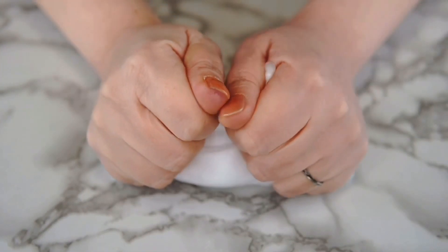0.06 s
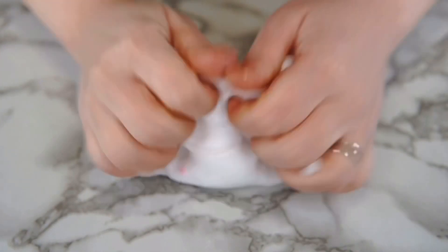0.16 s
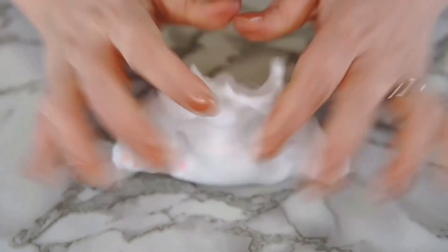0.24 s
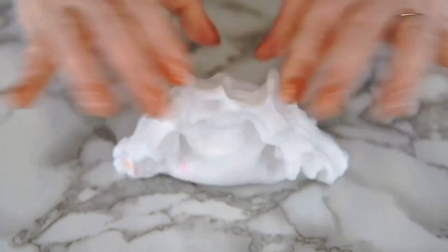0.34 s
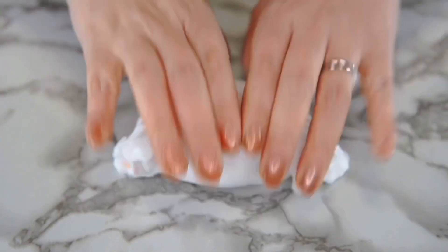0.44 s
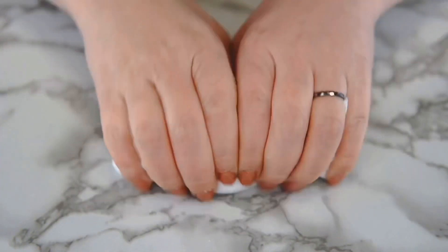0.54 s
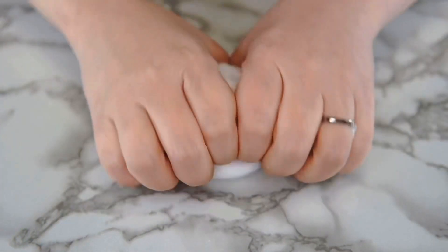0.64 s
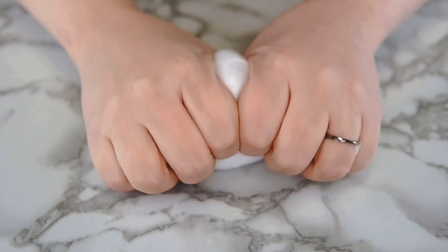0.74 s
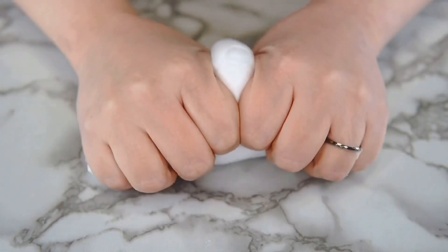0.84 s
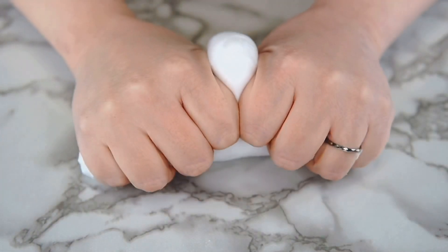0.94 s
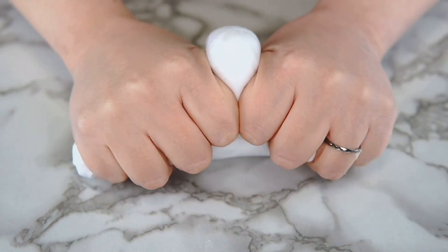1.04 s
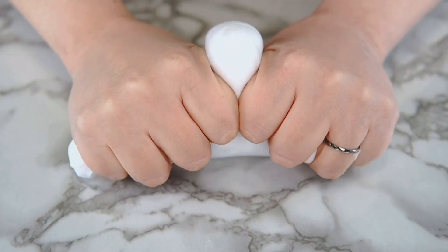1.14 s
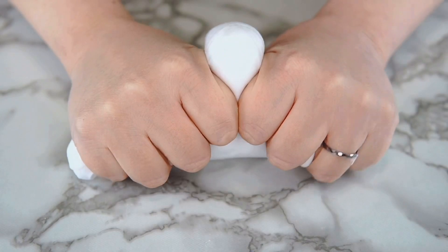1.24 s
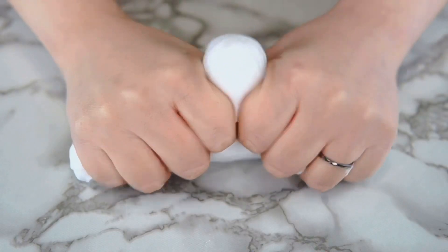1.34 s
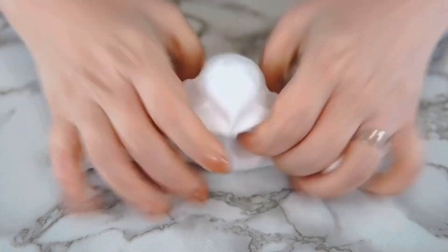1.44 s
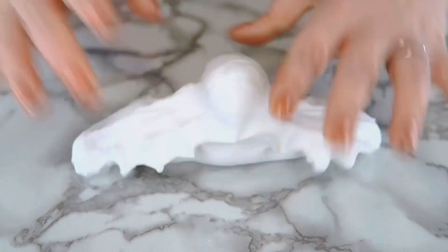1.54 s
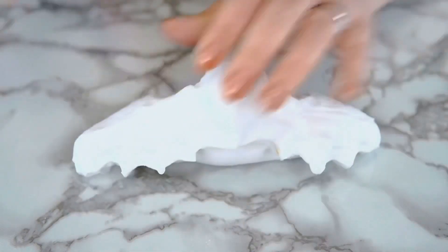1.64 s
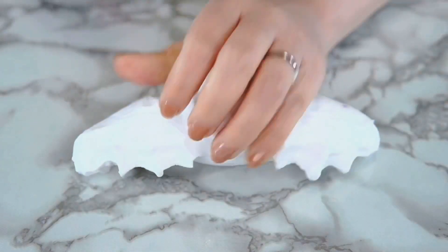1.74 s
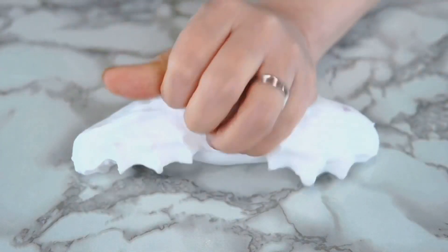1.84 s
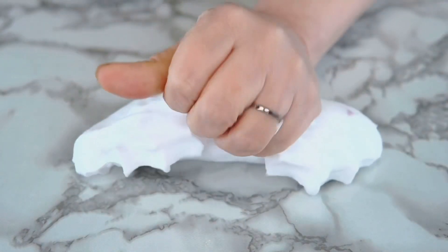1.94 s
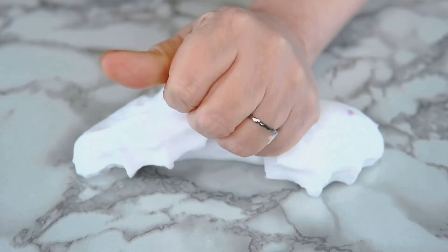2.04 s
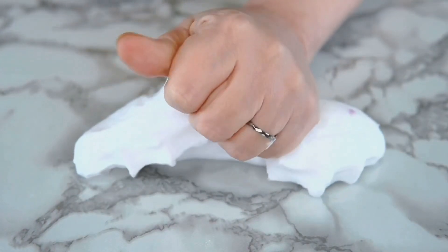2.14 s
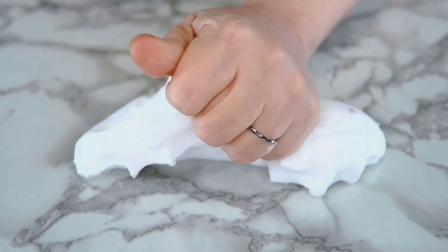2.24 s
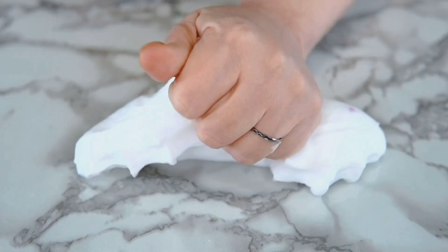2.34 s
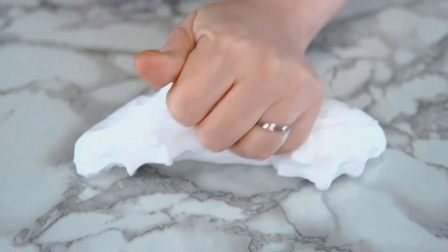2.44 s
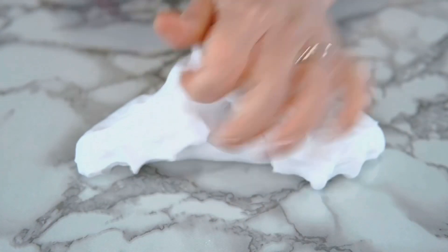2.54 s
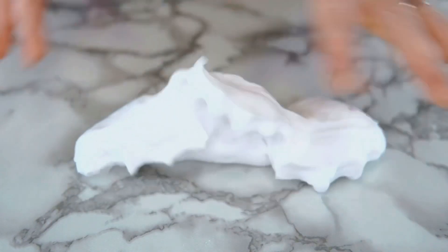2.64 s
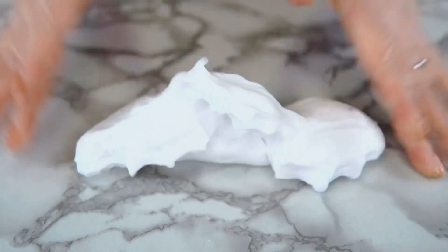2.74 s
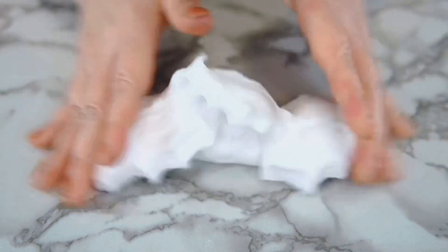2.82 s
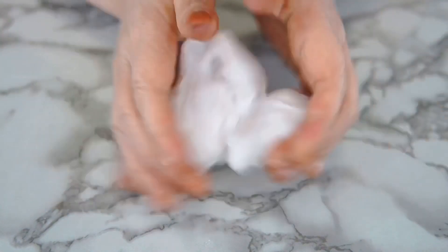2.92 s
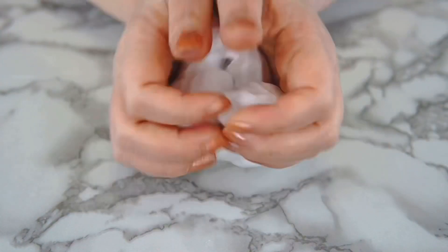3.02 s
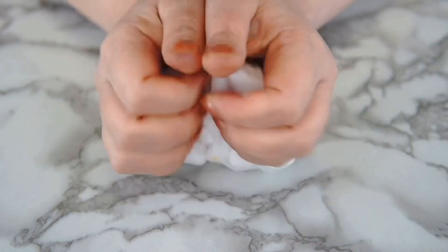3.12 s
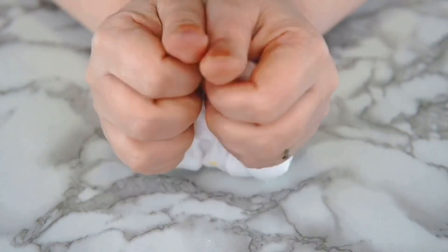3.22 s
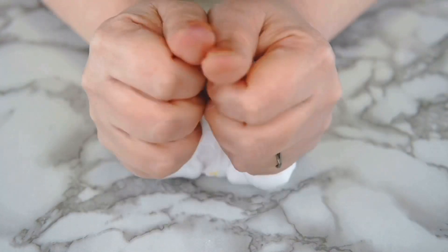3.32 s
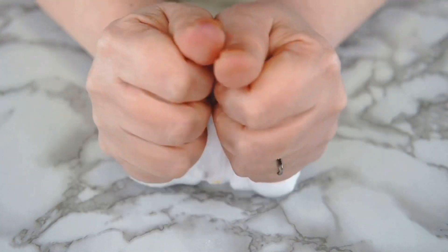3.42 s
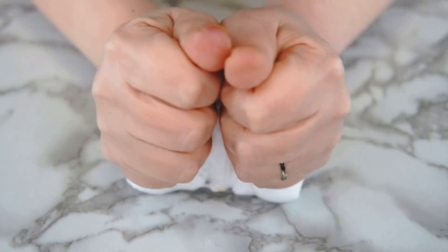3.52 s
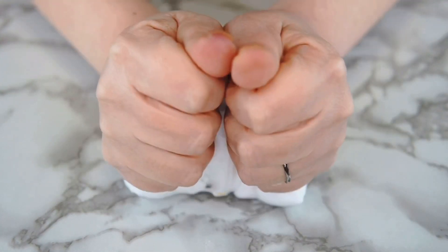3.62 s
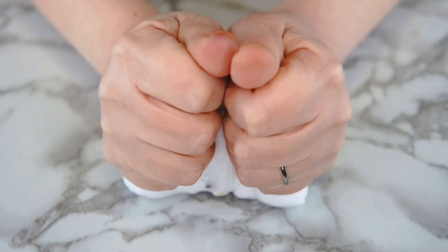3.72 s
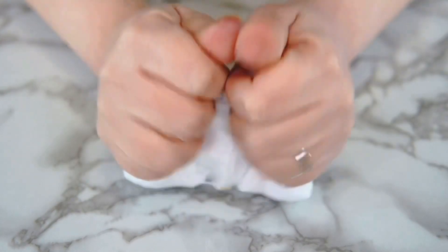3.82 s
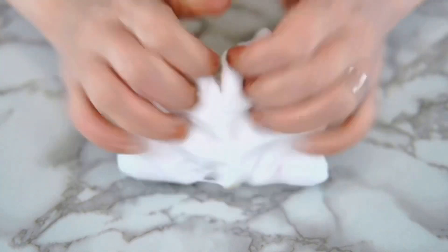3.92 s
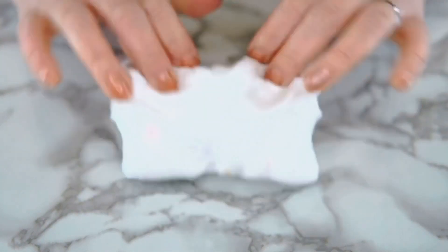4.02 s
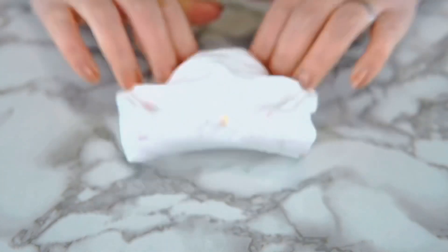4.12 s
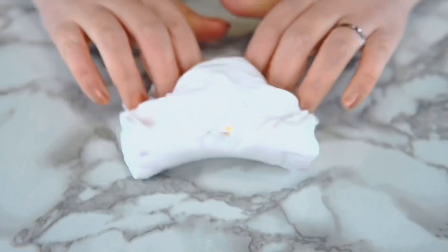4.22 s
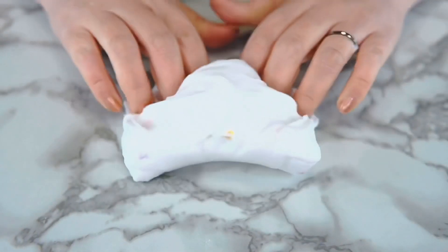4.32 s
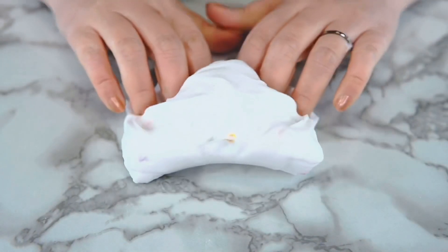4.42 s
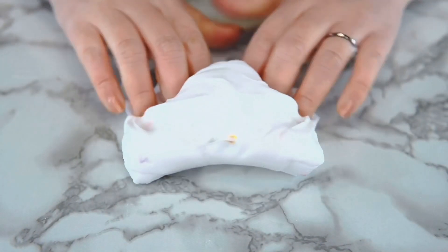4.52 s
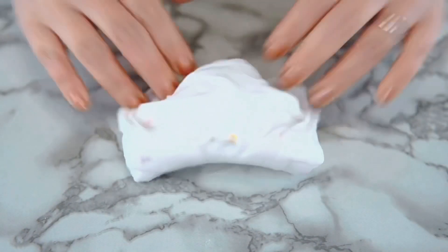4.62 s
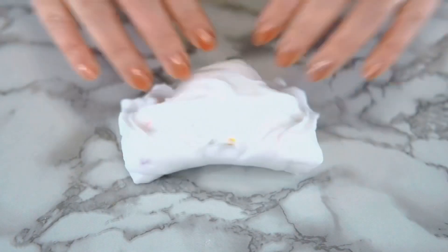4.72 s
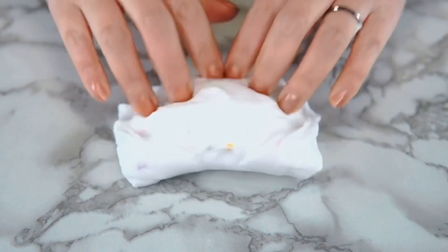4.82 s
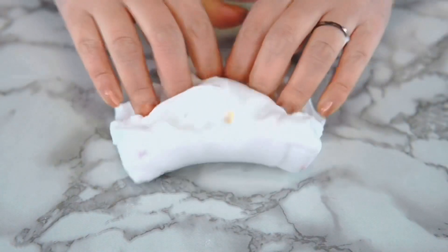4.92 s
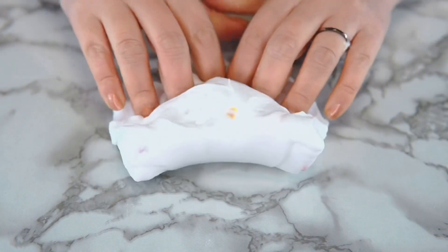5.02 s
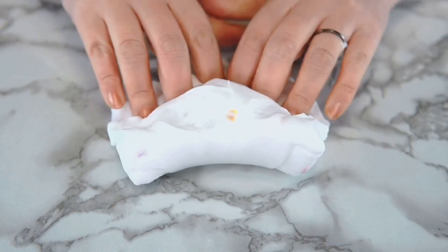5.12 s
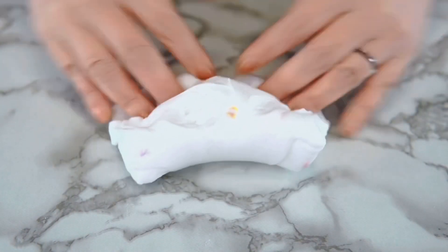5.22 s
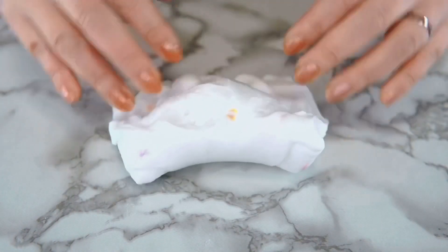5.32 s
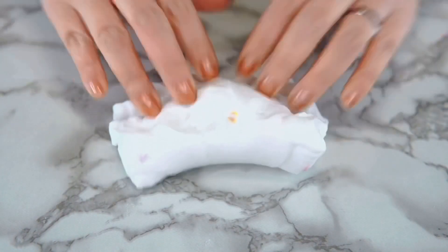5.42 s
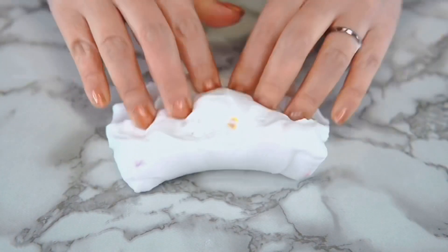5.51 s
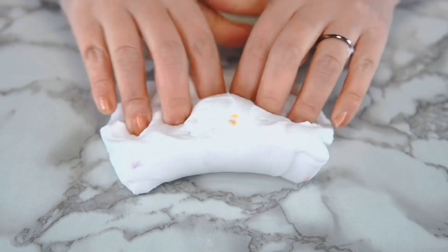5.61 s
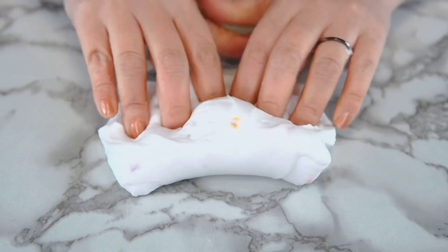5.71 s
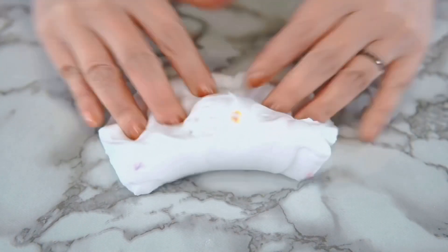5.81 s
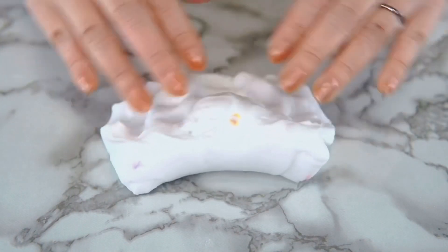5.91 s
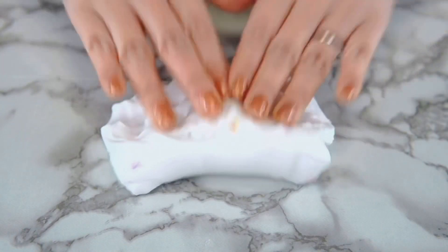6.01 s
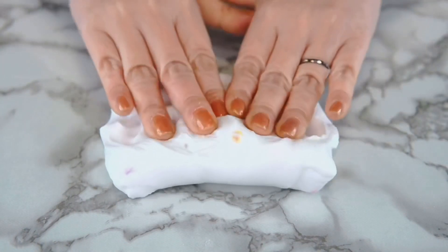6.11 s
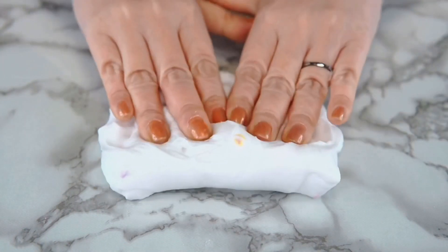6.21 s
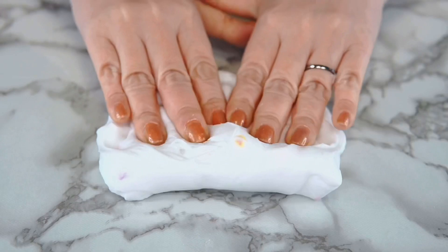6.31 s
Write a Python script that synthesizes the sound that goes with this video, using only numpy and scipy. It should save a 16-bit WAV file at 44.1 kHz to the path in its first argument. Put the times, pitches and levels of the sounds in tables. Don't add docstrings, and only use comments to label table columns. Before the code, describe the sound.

Foamy wet slime is kneaded, wrung and flattened. Air cells burst as sharp, brittle snaps scattered left and right, with falling wet plops, brief fizz and small ringing bubble notes. Low soft thuds come from the mass folding and the stand being nudged. Close stereo microphones, nearly silent room; busy first half, sparse quiet second half.

```python
import sys
import numpy as np
from scipy import signal
from scipy.io import wavfile
from scipy.ndimage import uniform_filter1d

SR = 44100
rng = np.random.default_rng(int(sys.argv[2]) if len(sys.argv) > 2 else 0)


def waveform_to_disk(signal):
    frames = np.transpose(np.atleast_2d(signal))
    scaled = np.clip(frames, -1, 1) * 32767
    samples = np.round(scaled).astype(np.int16)
    wavfile.write(sys.argv[1], SR, samples)


def how_loud(loudness_db):
    steps = np.asarray(loudness_db, float) / 20
    return 10 ** steps


N = 280476

# (time [s], peak [dB], ring [Hz], left-right [dB], after-fizz [dB])
LARGE_CELLS = [(0.5203, -4, 5950, -2.5, -15), (0.6057, -2.5, 7570, 5, -54.5),
               (0.6587, 0.5, 4200, -3.5, -13), (0.7423, -9.5, 9200, 0, -36), (0.745, -9, 9200, -2, -38),
               (0.7663, 1.5, 9300, 3, -29.5), (0.8364, 5.5, 6000, 4, -30), (1.0014, 1.5, 7500, -0.5, -20),
               (1.7883, -12, 6100, 9, -23.5), (1.7926, -19, 4000, -1.5, -7), (2.017, -7.5, 6860, 5, -11.5),
               (2.0463, -1, 7400, 0.5, -36), (2.1032, -7.5, 8400, -4.5, -34.5),
               (2.121, -8, 7500, 1.5, -2.5), (2.139, -12, 5000, 1, -22), (2.2981, -8, 8050, -5, -7.5),
               (2.301, -5, 4300, 1, -10.5), (2.8075, -11, 7100, 0.5, -22), (2.9529, -5, 6320, 3.5, -46),
               (3.2043, -7.5, 7960, 1.5, -21.5), (3.4649, 4.5, 7390, -5, -27.5),
               (3.6632, -4, 8720, 12, -18.5), (4.8245, -7, 7200, -4.5, -13)]
# (time [s], peak [dB], ring [Hz], after-fizz [dB])
SMALL_CELLS = [(0.0504, -14.5, 7800, -14), (0.357, -38.5, 6000, -8.5), (0.4725, -30, 8300, -10),
               (0.5979, -19, 6530, -2.5), (0.731, -14.5, 8300, -34), (0.756, -17.5, 4070, -3),
               (0.8347, -20.5, 9500, 4.5), (0.9415, -11.5, 8250, -26), (0.97, -23, 6770, -34),
               (1.2618, -18.5, 8450, -13), (1.7627, -25.5, 7300, -13), (1.9361, -20.5, 4940, 3),
               (1.944, -8, 4830, -21), (2.156, -2.5, 7650, -23), (2.2692, -7, 7660, -30),
               (2.4141, -16, 8400, -14), (2.4804, -33, 8000, -4.5), (2.4936, -14.5, 9160, -51),
               (2.7577, -15.5, 6560, -16), (2.821, -19, 3600, -43), (2.843, -26.5, 8350, -10.5),
               (2.9349, -37, 10350, -24), (2.9494, -11.5, 8600, -20.5),
               (3.0346, -36.5, 8400, -20), (3.131, -8.5, 7730, -30.5), (3.1813, -20.5, 7700, -21.5),
               (3.2153, -17, 8250, -48), (3.289, -30, 6660, -18), (3.3042, -10, 7440, -35),
               (3.332, -14, 8400, -26), (3.355, -23, 7950, -26), (3.392, -26, 7660, -18),
               (3.4578, -16, 7760, -39), (3.4875, -15, 7300, -29), (3.5, -15.5, 8140, -20),
               (3.532, -19, 9000, -39), (3.564, -30.5, 6830, -20), (3.6446, -25.5, 7100, -39),
               (3.9369, -28.5, 8240, -28), (4.162, -41, 4580, -7.5), (4.3531, -44, 9100, -16.5),
               (4.465, -35, 6540, -5.5), (4.4876, -23.5, 6300, -6), (4.7253, -25.5, 7720, -30.5),
               (4.8057, -28, 5100, -6.5), (4.94, -30.5, 7550, -12), (5.108, -26.5, 7760, -16),
               (5.473, -18.5, 9300, -35), (5.6739, -29.5, 7540, -12.5), (5.9867, -45.5, 8920, -10),
               (6.0808, -42, 7880, -21.5), (6.2553, -35.5, 7610, -17),
               (0.0372, -36, 8480, -20), (0.647, -30, 3665, 12.5), (0.5044, -25.5, 9040, -17),
               (0.8233, -42, 6820, -19), (1.1655, -44.5, 7800, -29), (1.235, -36, 6700, -18),
               (2.3868, -19, 8000, -12), (1.7554, -43, 6960, -17), (1.858, -41.5, 8950, -27.5),
               (1.9302, -28, 8300, -16.5), (2.7015, -45, 10100, -16), (2.7331, -37, 4010, -10),
               (2.793, -26, 6620, -32), (3.0445, -41, 9250, -26), (3.0705, -41.5, 5950, -8),
               (3.2767, -36, 4330, -14), (3.3513, -16.5, 8540, -22.5), (3.4482, -29, 4290, -20),
               (3.5136, -23, 8030, -26), (3.592, -44, 7380, -23), (3.6275, -49, 8120, -22),
               (4.1275, -48, 6340, -26), (4.255, -48.5, 6480, -19), (5.16, -24, 4606, -24),
               (5.5608, -44.5, 7400, -18), (5.7134, -21.5, 5430, -15.5)]
CELLS = LARGE_CELLS + SMALL_CELLS

# (time [s], peak [dB], cavity [Hz], after-squish [dB])
POCKET_COLLAPSES = [(0.3268, -37, 836, -18), (0.4284, -27.5, 764, -9.5), (0.4728, -25, 2140, -15.5),
                    (0.5206, -21.5, 2180, -28), (0.6072, -14.5, 1500, -17), (0.647, -28.5, 1520, 7),
                    (0.6599, -9, 1280, -16), (0.7568, -4.5, 1486, -12.5), (0.8356, -22, 2000, -7),
                    (0.943, -33, 1800, -10.5), (0.9694, -27.5, 2470, -16), (1.0006, -25.5, 1810, -5),
                    (1.2355, -25, 1660, -8.5), (1.7637, -32.5, 1394, -4.5), (1.79, -14, 1650, -12),
                    (1.9385, -17, 2480, -3), (2.0178, -22.5, 1855, -7), (2.063, -21, 1390, -13),
                    (2.1232, -8, 1405, -11), (2.2706, -27, 1220, -17), (2.3005, -14, 1225, -6),
                    (2.808, -24, 2335, -13.5),
                    (2.954, -22.5, 1440, -16.5), (3.132, -29.5, 1200, -17), (3.182, -31, 2600, -8.5),
                 (3.2049, -13, 1930, -19.5), (3.2754, -44, 2380, -5.5), (3.305, -23, 1660, -17.5),
                 (3.349, -32, 2080, -8.5), (3.393, -27, 1810, -14), (3.4476, -35, 2020, -6),
                 (3.4867, -23.5, 1720, -13.5), (3.5017, -28.5, 1410, -30), (3.5322, -31, 2380, -21.5),
                 (3.565, -36, 1460, -19.5), (3.6448, -37, 1410, -18), (3.663, -26.5, 2440, -8.5),
                 (4.038, -34.5, 1145, -0.5), (4.159, -32.5, 1630, -12), (4.2566, -47.5, 2046, -12),
                 (4.4977, -17.5, 2000, -13.5), (4.8234, -36.5, 2250, 4), (4.932, -39, 1250, -5.5),
                 (5.1165, -30.5, 870, -19), (5.4347, -49, 960, -14), (5.5623, -46.5, 1023, -12.5),
                 (5.6738, -47, 1820, 3.5),
                    (0.041, -51, 1880, -18), (0.0644, -27.5, 770, -19), (0.082, -31, 1150, -11),
         (0.1014, -35, 1130, -1), (0.335, -32.5, 1070, -13), (0.366, -48, 1530, -5),
         (0.3796, -39.5, 1130, -3.5), (0.3906, -41, 1130, -5), (0.553, -29, 1360, -3),
         (1.267, -24.5, 2270, -11), (1.299, -18.5, 1130, -6.5), (1.3471, -25, 1460, -6),
         (1.3637, -21, 1070, -14), (1.6814, -59, 2510, -6), (2.486, -40, 1630, -5),
         (2.6915, -52.5, 2010, -17), (2.7075, -52.5, 2210, -9), (2.726, -46, 2340, -18),
         (2.7603, -30.5, 1640, -16), (2.8626, -42.5, 1300, -1.5), (3.0135, -48, 1120, -11),
         (3.05, -44.5, 1900, -14), (3.1176, -52, 1160, -6), (3.7876, -39, 1200, -19),
         (3.8255, -35, 1320, -5), (3.8522, -32, 1240, -10.5), (4.021, -46, 1990, -4),
         (4.1466, -58, 1596, -11), (4.239, -59, 1414, -11), (4.4687, -34, 1550, -5),
         (4.7431, -57.5, 712, -8), (4.8083, -46, 1500, 2), (4.88, -45, 1030, -10),
         (4.9592, -43, 1096, -3.5), (4.9685, -51.5, 1090, -16), (5.1529, -28.5, 714, -14),
         (5.339, -61.5, 837, -12), (5.422, -57, 703, -5), (5.45, -44.5, 1170, -14), (5.4739, -55, 720, -12),
         (5.5338, -54, 920, -10.5), (5.7115, -32.5, 1060, -7), (5.9368, -53.5, 1230, -12),
         (5.9903, -57.5, 1290, -15.5), (6.0807, -63, 1224, -8), (6.2361, -54, 1880, -16),
         (6.2709, -53, 1900, -13), (6.3207, -40, 1870, -6)]
POCKETS = POCKET_COLLAPSES

# (time [s], peak [dB], note [Hz], t60 [s])
TRAPPED_AIR = [(0.681, -18.5, 1510, 0.035), (0.7575, -11.5, 1070, 0.028), (0.7585, -8, 1620, 0.027),
               (0.969, -28, 2365, 0.066), (1.2745, -27, 1515, 0.088), (1.296, -22, 2200, .03),
               (1.304, -25, 1065, 0.048), (1.317, -22, 1125, 0.044), (1.363, -30, 1060, 0.056),
               (1.942, -16, 5050, .05), (1.946, -22.5, 2336, 0.035), (2.0462, -23, 1200, 0.012),
               (2.127, -19.5, 4440, 0.073), (2.13, -21, 2830, 0.084), (2.136, -17.5, 1990, 0.031),
               (2.16, -42, 511, 0.27), (3.4576, -23, 1700, .012), (3.839, -36, 1150, .04),
               (4.0375, -32, 1540, 0.045), (4.492, -22, 970, 0.047), (5.71, -37, 650, 0.037),
               (5.753, -35.5, 1244, .06)]

# (peak time [s], rise [s], fall [s], fizz [dB], squish [dB])
HAND_PUSHES = [(0.114, 0.69, 0.08, -36, -36), (0.439, 0.13, 0.23, -51, -60), (0.681, 0.52, 0.38, -41.5, -39),
               (0.868, 0.064, 0.13, -27, -40.5), (1.021, 0.06, 0.13, -36.5, -49.5),
               (1.269, 0.073, 0.21, -34.5, -32), (1.353, 0.2, 0.072, -36.5, -35.5),
               (1.8, 0.13, 0.96, -60, -53.5), (1.95, 0.096, 0.39, -48.5, -46),
               (2.066, 0.046, 0.073, -26.5, -56), (2.152, 0.047, 0.12, -19.5, -35.5),
               (2.311, 0.016, 0.3, -39.5, -39), (2.485, 0.88, 0.056, -51, -49),
               (2.767, 0.11, 0.28, -47.5, -46.5), (3.1, 0.72, 0.2, -62.5, -64.5),
               (3.48, 0.088, 0.17, -47.5, -51.5), (3.68, 0.11, 0.76, -49.5, -54),
               (3.842, 0.12, 0.09, -41, -50.5), (3.985, 0.19, 0.18, -48.5, -61.5),
               (4.035, 0.24, 0.062, -50, -60.5),
               (4.169, 0.12, 0.36, -81, -64.5), (4.508, 0.071, 0.13, -41, -34),
           (4.84, 0.18, 0.26, -53.5, -60.5), (5.167, 0.1, 0.1, -44.5, -39),
           (5.47, 0.14, 0.29, -69.5, -68.5), (5.713, 0.069, 0.14, -43.5, -37.5),
           (6.299, 0.092, 0.11, -45.5, -44), (.21, 0.23, 0.15, -77, -69.5), (1.47, .15, 0.34, -72, -66.5),
           (1.669, 0.15, 0.19, -68.5, -73.5), (4.69, 0.35, 0.34, -81, -74.5),
           (4.956, 0.075, 0.13, -60, -59), (5.31, 0.34, .35, -83.5, -74.5), (5.565, 0.27, 0.17, -75.5, -70),
           (5.98, .6, 0.6, -76.5, -71.5)]
# (peak time [s], rise [s], fall [s], level [dB])
CUPPED_HANDS = [
    (.98, .04, .04, 10),
    (3.22, .2, 1.5, 3),
    (3.4, .5, .8, 0),
    (3.69, 1.5, .1, 6),
]
# (peak time [s], rise [s], fall [s], level [dB])
FOLDS = [(.11, 0.9, 0.13, -55), (.44, 0.081, 0.038, -46), (.68, 0.072, 0.032, -41.5),
         (1.31, 0.2, 0.18, -46), (1.8, 0.046, 0.043, -41.5), (1.95, 0.026, 0.023, -33.5),
         (2.15, 0.053, 0.029, -37), (2.31, 0.046, 0.25, -54.5), (2.21, .1, 0.13, -73),
         (2.8, 0.13, 0.18, -80), (2.96, 0.041, 0.099, -66.5), (3.15, 0.073, 0.28, -66.5),
         (3.68, 0.12, 0.35, -74), (4.05, 0.16, 0.18, -76), (4.17, 0.043, 0.17, -77),
         (4.96, 0.11, 0.13, -70.5), (5.57, .06, 0.065, -70.5), (3.84, 0.27, 0.14, -63.5),
         (4.51, 0.093, 0.044, -49.5), (4.83, 0.039, 0.087, -57), (5.16, 0.068, 0.082, -38),
         (5.7, 0.042, 0.13, -38.5), (6.3, 0.072, 0.15, -56.5)]
# (time [s], peak [dB])
LOW_SWEEPS = [
    (0.767, -32.5),
    (0.8357, -35),
    (1.0023, -24.5),
    (2.0455, -53),
    (3.466, -28),
    (3.6647, -29),
]
# (peak time [s], rise [s], level [dB])
NUDGES = [(.14, 0.82, -56), (0.338, 0.044, -42), (.44, 0.16, -40), (1.001, 0.51, -60.5), (1.26, 0.034, -44),
          (1.38, 0.2, -46), (1.62, 0.34, -70.5), (1.8, .05, -59.5), (2.12, 0.2, -55.5), (2.45, 0.22, -58.5),
          (2.658, 0.21, -58), (5.98, 0.5, -71.5), (3.661, 0.55, -65), (3.9, 0.24, -58), (4.49, 0.05, -44.5),
          (4.779, 0.33, -60.5), (5.14, 0.055, -43), (5.73, 0.066, -44), (6.291, 0.05, -47)]

# (frequency [Hz], level [dB])
FIZZ_SPECTRUM = [(2000, -15), (3000, -8), (4600, -4), (7000, -2.5), (10400, -5.5), (12000, -15),
                 (14000, -13), (16000, -15.5), (17000, -50)]
# (frequency [Hz], density [dB per Hz])
SQUISH_SPECTRUM = [(450, -23), (800, -2.5), (1150, -6.5), (2240, -2), (3200, -16), (4200, -46.5)]
# (frequency [Hz], density [dB per Hz])
FOLD_SPECTRUM = [(35, -50.5), (60, -19.5), (182, -10), (265, -2), (335, -8), (391, 0), (850, -5),
                 (1100, -34.5), (1870, -120)]
# (frequency [Hz], correlation [-1..1])
LIKENESS = [(130, -0.47), (300, 0.15), (1400, 0.95), (3100, 0.8), (7000, 0.4), (13000, 0.043)]
# (frequency [Hz], width [Hz], level [dB])
HAND_MODES = [(1070, 190, 0.5), (1540, 19, -1), (1880, 37, -0.5)]
# (frequency [Hz], width [Hz], level [dB])
SLAB_MODES = [(400, 50, 7), (514, 11, 11.5), (665, 120, 6)]


def snaps(ring_s=0.00018, crack_db=-1.0, echo_db=-12.5, ring_db=-13.5):
    out, t = np.zeros((2, N)), np.arange(400) / SR
    chance = rng.random((len(CELLS), 8))
    noises = rng.standard_normal((len(CELLS), 2, 4000))
    shape = ((t / ring_s) * np.exp(1 - t / ring_s)) ** 2
    for (s, peak_db, hz, *pan, tail_db), c, noise in zip(CELLS, chance, noises):
        pan_db = pan[0] if pan else 2.5 + 4.5 * (c[6] - .5)
        lag_s = np.array([[0], [(c[0] - .5) * 4e-5]])
        tone = np.sin(2 * np.pi * (hz * (t - lag_s) + c[1]))
        crack = np.diff(noise[:, -401:])
        burst = shape * (tone + how_loud(crack_db) * (0.22 * crack[0] + 0.026 * crack))
        for side in range(2):
            for echo in c[2 + 2 * side:4 + 2 * side]:
                lag = int((0.00062 + 0.0022 * echo) * SR)
                burst[side, lag:] += how_loud(echo_db - 3.3 * echo) * burst[side, :-lag]
        gain = how_loud(peak_db) * how_loud([[pan_db / 2], [-pan_db / 2]])
        tail = after_ring(noise, hz, sharpness=2.0, t60_s=0.19)
        add(out, gain * burst, s - ring_s)
        add(out, gain * how_loud(tail_db + ring_db) * tail, s)
    return out


def pockets(width_s=0.00046, octaves=2.52, hollow_db=-7.5):
    out, t = np.zeros((2, N)), np.arange(512) / SR
    chance = rng.random((len(POCKETS), 3))
    noises = rng.standard_normal((len(POCKETS), 2, 5000))
    shape = (t / width_s) * np.exp(1 - t / width_s)
    for (s, peak_db, hz, tail_db), c, noise in zip(POCKETS, chance, noises):
        pitch_hz = hz * 2 ** (octaves * (np.exp(-t / (1.71 * width_s)) - .45))
        note = shape * np.sin(2 * np.pi * (np.cumsum(pitch_hz) / SR + c[0]))
        pan_db = 1.4 * (c[1] - .2)
        gain = how_loud(peak_db) * how_loud([[pan_db], [-pan_db]])
        tail = after_ring(noise, hz, sharpness=5, t60_s=.12)
        add(out, gain * note, s - width_s)
        add(out, gain * how_loud(tail_db + hollow_db) * tail, s)
    return out


def trapped_air(rise_s=0.0011, glide=0.017, pan_db=1.5):
    out, t = np.zeros((2, N)), np.arange(9000) / SR
    for (s, peak_db, hz, t60_s), c in zip(TRAPPED_AIR, rng.random((len(TRAPPED_AIR), 2))):
        phase = 2 * np.pi * (hz * t * (1 + glide * np.minimum(t / t60_s, 1)) + c[0])
        note = np.sin(phase) * (1 - np.exp(-t / rise_s)) * how_loud(peak_db - 60 * t / t60_s)
        add(out, note * how_loud(pan_db * (c[1] - 1.2) * np.array([[1], [-1]])), s)
    return out


def fizz(level_db):
    bright = [cell for cell in CELLS if cell[2] > 4600]
    power = how_loud(2 * level_db) + how_loud(-8.5) * dying(bright, t60_s=0.1, rise_s=0.00026)
    return np.sqrt(power) * foam(FIZZ_SPECTRUM, per_s=20000, spread_db=2.3, patchy_db=1.6, patch_hz=50)


def squish(level_db):
    power = how_loud(2 * level_db) + how_loud(-1.0) * dying(POCKETS, t60_s=0.097, rise_s=0.00016)
    wet = np.sqrt(power) * foam(SQUISH_SPECTRUM, per_s=3000, spread_db=3.0, patchy_db=2.8, patch_hz=45)
    return how_loud(-4.5) * add_modes(wet, HAND_MODES)


def ticks(level, over_db):
    born = rng.random(N) < 260 * how_loud(5 * drift(8)) / SR
    sizes = born * level * how_loud(over_db + 3 * np.minimum(rng.exponential(1, N), 3))
    dealt, out = rng.integers(0, 14, N), np.zeros((2, N))
    for k, hz in enumerate(np.geomspace(1000, 9500, 14)):
        r, w = how_loud(-60 * hz / (18 * SR)), 2 * np.pi * hz / SR
        kicks = sizes * (dealt == k) + 1e-18
        rung = signal.lfilter([np.sin(w)], [1, -2 * r * np.cos(w), r * r], kicks)
        out += rung * how_loud([[k % 3], [-(k % 3)]])
    return out


def cupped_hands(wet):
    return how_loud(swells(CUPPED_HANDS, -30)) * resonate(wet, 2330, 10)


def folding():
    level_db = uniform_filter1d(swells(FOLDS, rest_db=-91), size=500)
    grains = foam(FOLD_SPECTRUM, per_s=5000.0, spread_db=4.0, patchy_db=1.6, patch_hz=30.0)
    return add_modes(how_loud(level_db - 1.5) * grains, SLAB_MODES)


def low_sweeps(top_s=0.0012, turns=0.86):
    out, t = np.zeros((2, N)), np.arange(1, 1500) / SR
    sweep = np.cos(2 * np.pi * turns * np.log(t / top_s)) * np.exp(-t / 0.0072)
    sweep *= 2 * (t / top_s) ** 2 / (1 + (t / top_s) ** 2.93)
    for s, peak_db in LOW_SWEEPS:
        add(out, how_loud(peak_db) * sweep * [[1.1], [.9]], s)
    return out


def stand(skirt_db=-6.5, shared_db=-12.5, floor_db=-99.0, fall_s=0.27):
    level_db = swells([(s, rise_s, fall_s, db) for s, rise_s, db in NUDGES], rest_db=-97)
    shake = rng.standard_normal((2, N))
    mode = rms_one(resonate(resonate(shake[0], 88, 2.6), 88, 2.6))
    skirt, shared = rms_one(band_pass(shake, 50, 260))
    rocking = how_loud(level_db) * rms_one(mode + how_loud(skirt_db) * skirt) * [[1], [-1]]
    return rocking + (how_loud(level_db + shared_db) + how_loud(floor_db)) * shared


def foam(spectrum, per_s, spread_db, patchy_db, patch_hz):
    low_hz = max(spectrum[1][0] / 1.5, 30)
    top_hz = min(spectrum[-2][0] * 1.402, 17500)
    edges_hz = np.geomspace(low_hz, top_hz, int(3 * np.log2(top_hz / low_hz)) + 2)
    sizes = how_loud(spread_db * np.minimum(rng.exponential(1, N), 5))
    grains = sizes * (rng.random(N) < per_s / SR)
    white = rng.standard_normal((2, 2, N)) * rms_one(grains)
    out, together = 0, drift(patch_hz)
    for k, (low, high) in enumerate(zip(edges_hz, edges_hz[1:])):
        mid, side = band_pass(white[k % 2], low, high)
        hz = np.sqrt(low * high)
        alike = np.clip(at_hz(LIKENESS, hz), -1, 1)
        gain = how_loud(at_hz(spectrum, hz) + patchy_db * (.5 * together + drift(patch_hz)))
        out = out + gain * (np.sqrt(1 + alike) * mid + np.sqrt(1 - alike) * side * [[1], [-1]])
    return out / np.sqrt(np.mean(np.mean(out, axis=0) ** 2))


def after_ring(noise, hz, sharpness, t60_s):
    t = np.arange(noise.shape[1]) / SR
    coloured = resonate(resonate(noise[0] + .45 * noise, hz, sharpness), hz, sharpness)
    return rms_one(coloured) * how_loud(-60 * t / t60_s) * (1 - np.exp(-t / 0.00065))


def dying(rows, t60_s, rise_s):
    kicks = np.zeros(N)
    for row in rows:
        kicks[round(row[0] * SR)] += how_loud(2 * (row[1] + row[-1]))
    fall, rise = how_loud(-120 / (t60_s * SR)), np.exp(-1 / (rise_s * SR))
    decay = signal.lfilter([1], [1, -fall], kicks + 1e-18)
    return signal.lfilter([1 - rise], [1, -rise], decay)


def swells(rows, rest_db, climb_db=41, rounding=1.2):
    t = np.arange(0, N, 64) / SR
    s, rise_s, fall_s, peak_db = np.transpose(rows)[:, :, None]
    below_db = climb_db * np.maximum((s - t) / rise_s, (t - s) / fall_s) ** rounding
    power = how_loud(2 * (peak_db - below_db)).sum(axis=0) + how_loud(2 * rest_db)
    return np.interp(np.arange(N) / SR, t, 10 * np.log10(power))


def drift(rate_hz):
    r = np.exp(-40 * np.pi * rate_hz / SR)
    slow = signal.lfilter([1], [1, -2 * r, r * r], rng.standard_normal(N // 20 + 2002))[2000:]
    return np.interp(np.arange(N) / 20, np.arange(len(slow)), rms_one(slow))


def add_modes(push, modes):
    return push + sum(how_loud(level_db) * resonate(push, hz, hz / width_hz) for hz, width_hz, level_db in modes)


def resonate(x, hz, q):
    b, a = signal.iirpeak(hz, q, fs=SR)
    return signal.lfilter(b, a, x)


def band_pass(x, low_hz, high_hz):
    return signal.sosfilt(signal.butter(2, [low_hz, high_hz], "band", fs=SR, output="sos"), x)


def at_hz(points, hz):
    points_hz, values = np.transpose(points)
    return np.interp(np.log(hz), np.log(points_hz), values)


def rms_one(x):
    return x / np.sqrt(np.mean(x ** 2) + 1e-20)


def add(out, sound, s):
    i = max(round(s * SR), 0)
    out[:, i:i + sound.shape[1]] += sound[:, :N - i]


def scene():
    hands = np.array(HAND_PUSHES)
    fizz_db = swells(hands[:, :4], rest_db=-85)
    squish_db = swells(hands[:, [0, 1, 2, 4]], rest_db=-86.5)
    wet = squish(squish_db) + pockets()
    wet += ticks(how_loud(fizz_db) + how_loud(squish_db), over_db=-7.0)
    wet += cupped_hands(wet)
    wet += snaps() + fizz(fizz_db)
    bursts = signal.sosfilt(signal.butter(5, 300, "high", fs=SR, output="sos"), wet)
    return bursts + trapped_air() + folding() + low_sweeps() + stand()


def roll_off(x):
    return signal.sosfilt(signal.butter(12, 17150, fs=SR, output="sos"), x)


def record(dry):
    held = dry / (1 + (dry / .8) ** 8) ** (1 / 8)
    cut = signal.sosfilt(signal.cheby2(10, 60, 17200, fs=SR, output="sos"), held)
    return roll_off(cut)


dry = scene()
out = record(dry)
waveform_to_disk(out)
```